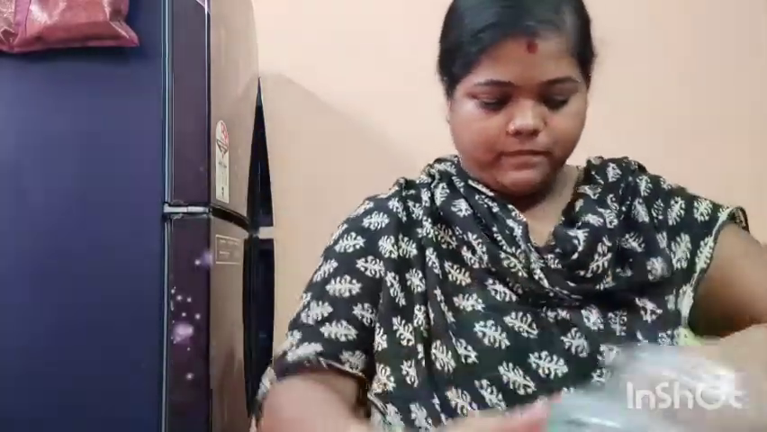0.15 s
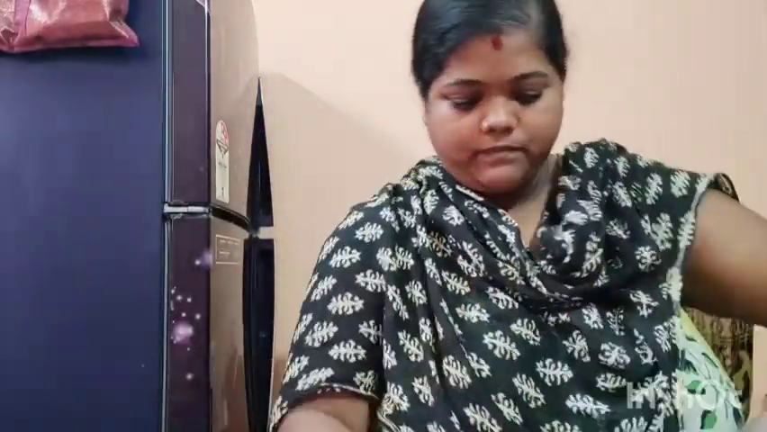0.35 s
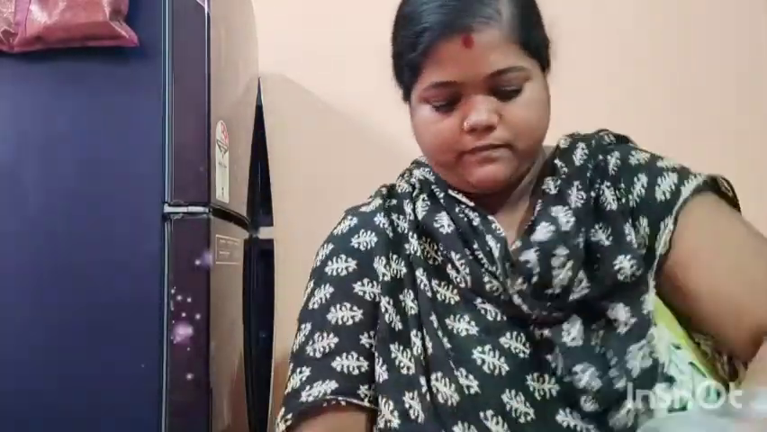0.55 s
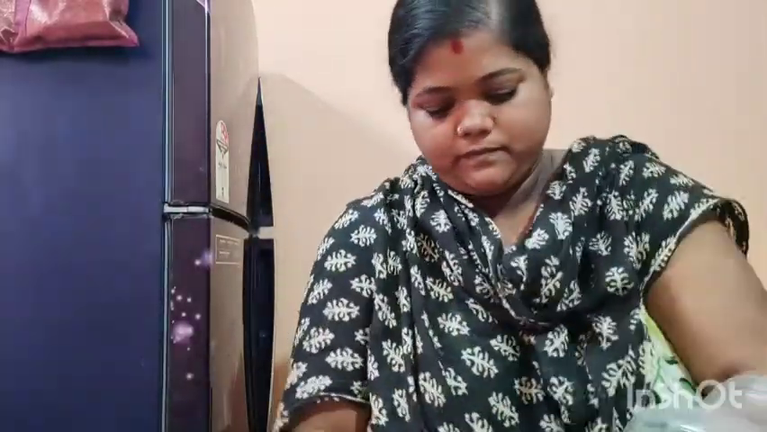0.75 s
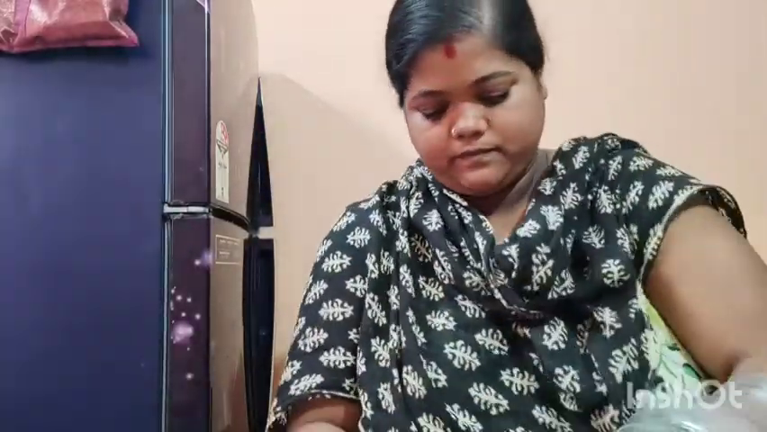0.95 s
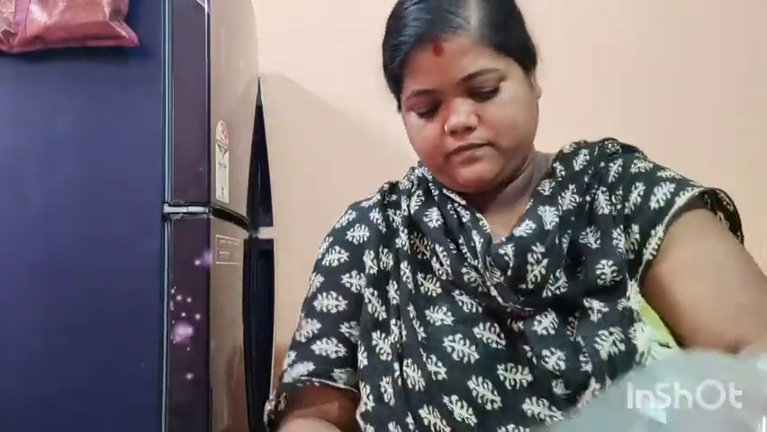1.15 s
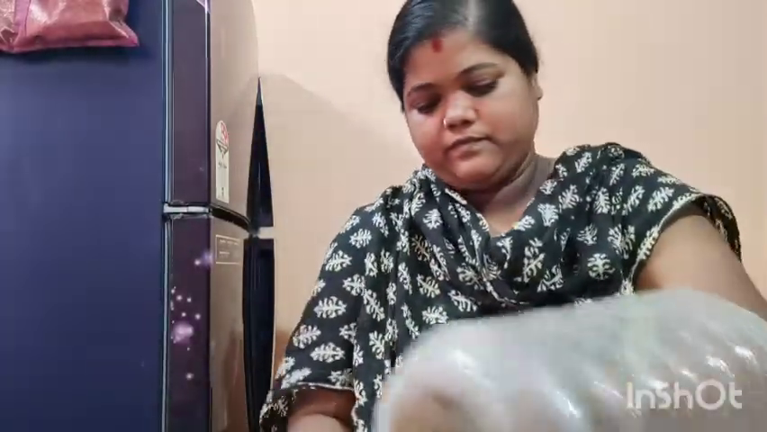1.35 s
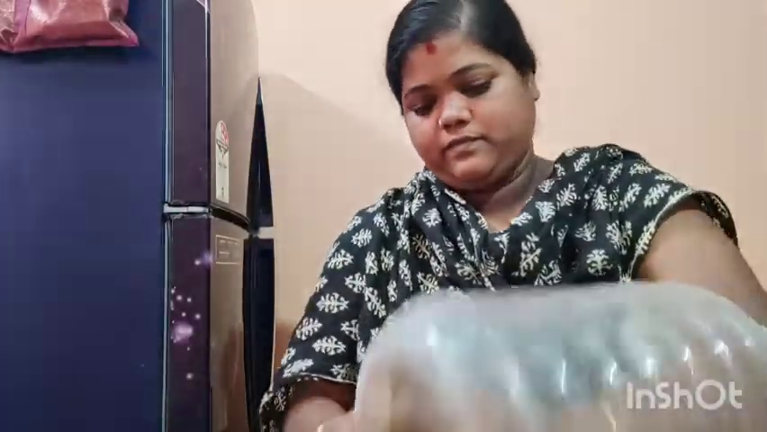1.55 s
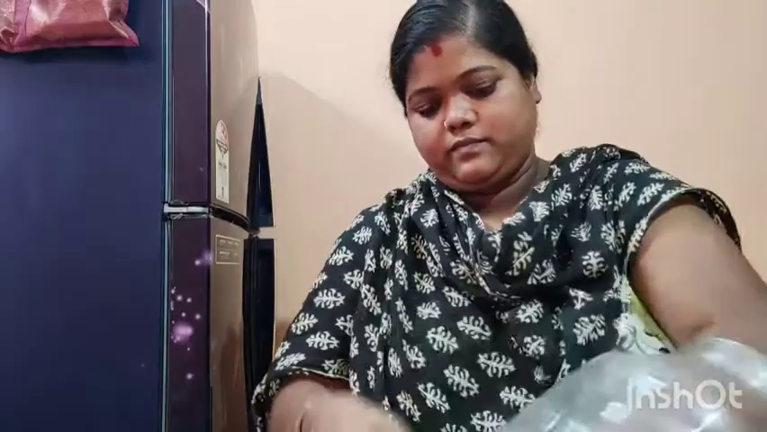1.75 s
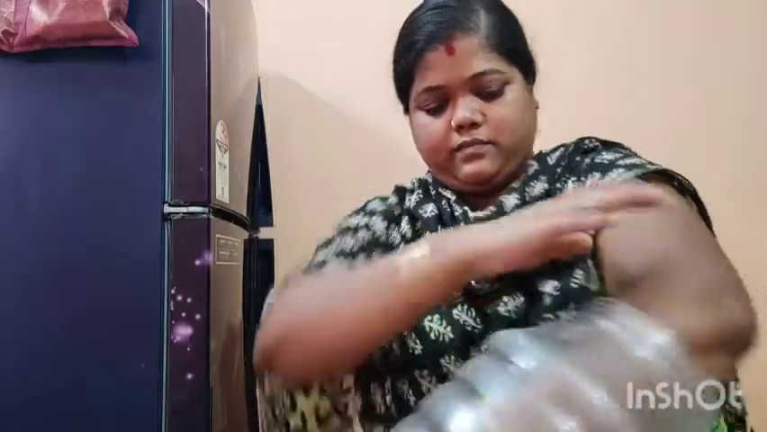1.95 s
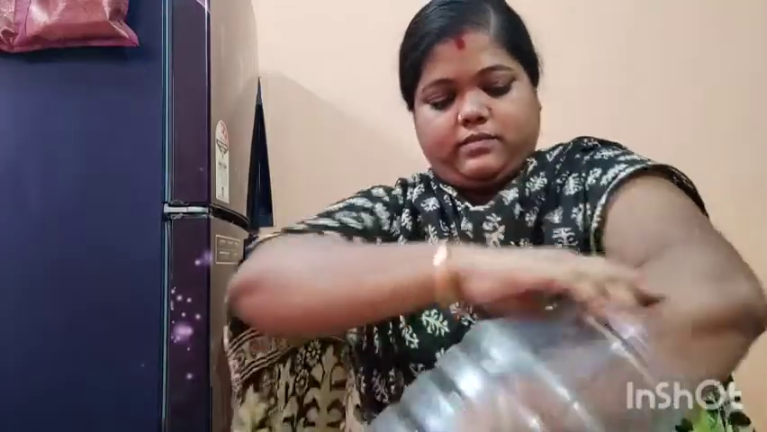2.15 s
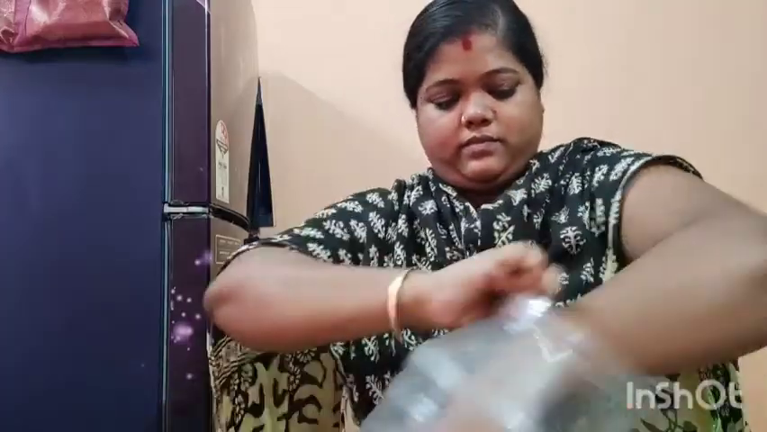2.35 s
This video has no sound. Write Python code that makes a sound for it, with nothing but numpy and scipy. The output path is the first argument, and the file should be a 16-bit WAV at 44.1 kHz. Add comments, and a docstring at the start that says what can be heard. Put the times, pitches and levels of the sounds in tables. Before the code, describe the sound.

A large hollow plastic jar is wiped with a cloth, close in stereo in a small, hard-walled kitchen. A firm scrub with boomy wall flexes peaks around 0.2-0.4 s; a plastic tub clatters brightly at 0.53. Softer rubbing follows, with a faint tap at 1.12 and a hiss near 1.3. Hollow bumps come at 1.5-1.75, then near quiet, a thump and click at 2.2, and another click at 2.43 amid renewed wiping.

```python
"""Wiping a plastic jar

A cloth wipes a large clear plastic jar in a small, hard-walled kitchen, with two microphones close by.
Tiny slips of the cloth hiss, scrub and make the hollow jar sing; sliding low tones are wall flexes, bumps
and thumps. A tub clatters, the jar is bumped as it is turned over, and tub and rim give bright clicks:
struck modes over dense washes. The kitchen answers with a decaying noise tail, above a still room's hush."""
import sys
import numpy as np
from scipy import signal
from scipy.fft import rfft, irfft, next_fast_len
from scipy.io import wavfile
from scipy.ndimage import map_coordinates

SR = 44100
rng = np.random.default_rng(int(sys.argv[2]) if len(sys.argv) > 2 else 0)


def bounce(signal):
    """Save signal as a 16-bit WAV file at the path given by the first command-line argument."""
    frames = np.transpose(np.atleast_2d(signal))
    limited = np.clip(frames, -1, 1)
    pcm = np.round(limited * 32767).astype(np.int16)
    wavfile.write(sys.argv[1], SR, pcm)


N = 110250  # samples: 2.5 s

# All levels are relative. Spectra list pitch_hz, density_db_per_hz.
# Speed of the cloth, as hiss: time_s, level_db
WIPE_SPEED = [(0, -61), (.09, -54), (.14, -45), (.212, -45), (.224, -31), (.3, -43), (.42, -41.5),
              (.5, -52), (.66, -49), (.72, -40.5), (.78, -49.5), (1.02, -47), (1.11, -50), (1.21, -47),
              (1.285, -34.5), (1.4, -55.5), (1.445, -42), (1.5, -56.5), (1.61, -44), (1.7, -42),
              (1.76, -49), (1.795, -42.5), (1.86, -55.5), (2.13, -56), (2.21, -53), (2.26, -48),
              (2.5, -45.5)]
# Firm strokes that make the hollow jar sing: start_s, length_s, level_db
FIRM_STROKES = [(0.183, 0.11, -37.5), (2.239, 0.25, -42), (2.44, 0.062, -39.5)]
# Pressure of the hand on the wall, as scrubbing: time_s, level_db
HAND_PRESSURE = [(.1, -54), (.14, -41.5), (.2, -50.5), (.25, -32.5), (.33, -36.5), (.42, -47), (.47, -40),
                 (.75, -38), (.86, -49), (1.05, -44), (1.2, -52), (1.3, -47), (1.4, -57), (1.45, -41.5),
                 (1.51, -50.5), (1.6, -47), (1.66, -39.5), (1.77, -39), (1.9, -57.5), (2.17, -55),
                 (2.27, -46), (2.5, -42.5)]
# Low tones of the jar: wall flexes, dull bumps and thumps:
# start_s, rise_s, fade_t60_s, first_hz, last_hz, level_db
LOW_TONES = [(0.115, 0.053, .42, 261, 287.4, -35.5), (0.228, 0.02, 0.091, 303, 240, -21.5),
             (.252, 0.027, 0.3, 139, 128.7, -16.5), (.305, 0.021, 0.12, 254, 279, -22.5),
             (0.329, 0.02, 0.076, 128, 148, -32), (0.366, .018, 0.14, 274, 215, -31.5),
             (0.389, 0.035, 0.13, 159.5, 117.5, -31.5), (.457, 0.0062, 0.087, 159, 90, -25),
             (0.456, 0.017, 0.11, 263, 325, -29.5), (.497, 0.01, 0.73, 132.7, 151, -28.5),
             (0.678, 0.023, .17, 224, 172, -36), (.724, 0.031, 0.31, 136, 121, -34),
             (0.979, 0.082, 0.094, 119, 140.5, -42), (1.288, 0.028, 0.36, 182, 119.6, -36),
             (1.442, 0.029, 0.9, 84.4, 135, -39.5), (1.525, 0.0033, 0.08, 313, 335, -21),
             (1.538, 0.017, 0.086, 347, 353, -23.5), (1.665, 0.042, 0.38, 148.7, 117.4, -34.5),
             (2.195, 0.0031, 0.054, 383, 267, -25), (2.206, 0.0081, 0.15, 139.4, 121, -25),
             (2.203, 0.018, 0.73, 176.5, 183.7, -31)]
# Soft bumps on the jar: start_s, level_db, contact_hardness_hz
JAR_BUMPS = [(1.5245, -25, 1160), (1.637, -27.5, 1490), (1.6935, -22.5, 3800), (1.698, -12.5, 1180),
             (1.704, -31, 1480), (1.7115, -30, 2220), (1.727, -28, 1700), (1.735, -38, 2400),
             (1.765, -34, 990)]
# The tub clattering, then one more tap: start_s, level_db, contact_hardness_hz
TUB_BLOWS = [(.5305, -18.5, 8700), (.5355, -25, 7250), (.542, -19.5, 4400), (.549, -22.5, 2080),
             (.556, -27, 2200), (.565, -28, 3200), (1.123, -40.5, 2380)]
# Bright clicks: the tub's first tick, its later tap, two clicks of the rim:
# start_s, level_db, contact_hardness_hz
BRIGHT_CLICKS = [(.528, -21.5, 14200), (1.1236, -44.5, 3000), (2.2295, -27, 12200), (2.4315, -27.5, 9350)]

# Clear ringing modes of the jar, the tub and the bright clicks: pitch_hz, level_db, t60_s
JAR_MODES = [(285.6, -8.5, 0.067), (359, -12, 0.15), (603, -10.5, 0.11), (748.7, -9, 0.069),
             (1082, -13.5, 0.062), (1305, -9.5, 0.04)]
TUB_MODES = [(194, -20.5, .3), (391.4, -8, 0.38), (463, -9, 0.2), (547, -8.5, 0.15), (724, -6, 0.11),
             (785, -3, 0.077), (924, -7.5, .13), (1004, -5, 0.074), (1104, -12.5, 0.18), (1335, -11, 0.25),
             (1492, -12, 0.15), (1660, -8.5, 0.089), (1852, -21.5, 0.3), (2284, -14, 0.14),
             (2638, -1.5, 0.077), (2890, -16, 0.12), (2963, -7, 0.077)]
CLICK_MODES = [(2330, 5, 0.014), (2910, 6, 0.025), (3390, -8.5, 0.018)]

# Fine cloth hiss on plastic: pitch_hz, density_db_per_hz
HISS_SPECTRUM = [(500, -25), (1500, -15.5), (3000, -9.5), (5000, -10), (6900, -6), (7900, 2), (8500, -4),
                 (9600, -6), (10600, -18), (12500, -24), (15500, -35)]
# Slips coloured by the hollow of the jar: pitch_hz, density_db_per_hz
HOLLOW_SPECTRUM = [(300, -38), (600, 3), (920, 4.5), (1150, 5.5), (1500, -2.5), (2400, -3.5), (3200, -9),
                   (5000, -30)]
# The scrubbed wall: pitch_hz, density_db_per_hz
SCRUB_SPECTRUM = [(30, -18), (80, 3.5), (190, 9.5), (290, 2), (420, 5), (600, -4), (1050, -3.5), (1600, -9),
                  (2700, -9.5), (4000, -55), (9000, -68)]
# Dense higher modes of the jar, the tub and the bright clicks: pitch_hz, density_db_per_hz
JAR_WASH_SPECTRUM = [(40, -26), (100, -3), (300, 11.5), (500, -1), (750, 6), (1300, -3.5), (2600, -4.5),
                     (4500, -12), (8000, -4), (12000, -34)]
TUB_WASH_SPECTRUM = [(40, -38), (110, -5), (280, 1), (420, 7), (900, 3), (1800, -1), (2800, -2.5),
                     (3600, -13.5), (4600, -5.5), (6000, -11), (8500, -4.5), (10500, -16), (13000, -47)]
CLICK_WASH_SPECTRUM = [(300, -8.5), (1200, -2), (2600, 2.5), (4500, -10), (8000, -5), (9800, -7),
                       (12000, -38), (15500, -26)]
# The crack that opens a bright click: pitch_hz, density_db_per_hz
SNAP_SPECTRUM = [(2000, -14), (5000, -9), (8000, 11), (10000, -3), (12000, -26), (15500, -19)]
# The still room: pitch_hz, density_db_per_hz
STILL_SPECTRUM = [(15, -24), (25, 1.5), (86, -17.5), (1340, -20.5), (9050, -35.5), (15500, -56)]

# Decay of the kitchen: pitch_hz, t60_s
ROOM_DECAY = [(100, 0.29), (500, 0.65), (6000, 0.83), (12000, 0.22)]
# Likeness of the two microphones, 1 for identical: pitch_hz, likeness
MIC_LIKENESS = [(60, 0.58), (200, 0.98), (550, 0.5), (1650, 0.099), (5000, 0)]
# Balance of the two microphones: pitch_hz, left_minus_right_db
MIC_BALANCE = [(100, 5.5), (380, 4), (750, 2.5), (2400, -1), (4400, -2), (8000, -6), (14000, 6.5)]

SCRUB_RING_DB, SCRUB_RING_WIDTH_HZ = -13, 20.8
GLIDE_S, OVERTONE_DB = 0.039, -18
TONE_WANDER, TONE_ROUGH = 0.025, 0.28  # random depth of pitch and of loudness, as fractions
SNAP_DB, SNAP_T60_S = 5, 0.008  # level is over that of its click
STILL_DB = -52
TOP_HZ = 15900


def amp(db):
    """Decibels to gain."""
    return 10 ** (np.asarray(db) / 20)


def unit(x):
    """Scale to rms 1."""
    return x / np.sqrt(np.mean(x ** 2) + 1e-20)


def along(points, hz):
    """Read (Hz, value) points on a log frequency axis."""
    f, v = np.transpose(points)
    return np.interp(np.log(hz + 1), np.log(f + 1), v)


def curve(rows):
    """One value per sample from (s, value) rows."""
    return np.interp(np.arange(N) / SR, *np.transpose(rows))


def wobble(rate):
    """A smooth random curve, rate knots a second."""
    knots = rng.standard_normal(int(N * rate / SR) + 4)
    return map_coordinates(knots, [np.arange(N) * rate / SR])


def filtered(x, response):
    """Multiply the spectrum of x by a response of frequency."""
    n = x.shape[-1]
    m = next_fast_len(n + 8192)
    return irfft(rfft(x, m) * response(np.fft.rfftfreq(m, 1 / SR)), m)[..., :n]


def half_angle(hz):
    """Half the phase angle whose cosine is the likeness of the microphones."""
    return np.arccos(np.clip(along(MIC_LIKENESS, hz), -1, 1)) / 2


def spread(pair, spectrum):
    """Colour two unrelated signals into a stereo pair of rms 1, most alike near 200 Hz."""
    def response(hz):
        mid_side = np.array([np.cos(half_angle(hz)), np.sin(half_angle(hz))])
        return amp(along(spectrum, hz)) * mid_side

    mid, side = filtered(pair, response)
    return unit(np.array([mid + side, mid - side]))


def stereo_noise(n, spectrum):
    """Coloured noise, n samples long, across the two microphones."""
    return spread(rng.standard_normal((2, n)), spectrum)


def add(track, s, sound):
    """Mix a sound into the track at s seconds."""
    i = round(s * SR)
    track[:, i:i + sound.shape[-1]] += sound[..., :N - i]


def slips(per_s):
    """Tiny stick-slip catches: shared instants, but unrelated uneven sizes in the two signals."""
    caught = rng.random(N) < per_s / SR
    return unit(caught * rng.standard_normal((2, N)))


def cloth():
    """Fibres catch on the plastic: a fine hiss that follows the speed of the stroke."""
    level_db = curve(WIPE_SPEED) + 1.5 + 1.5 * wobble(58.66)
    return spread(slips(per_s=9000), HISS_SPECTRUM) * amp(level_db)


def rubs():
    """A firm stroke swells and fades, its slips coloured by the hollow of the jar."""
    level, t = np.zeros(N), np.arange(N) / SR
    for s, length_s, db in FIRM_STROKES:
        level += amp(db) * np.sin(np.pi * np.clip((t - s) / length_s, 0, 1))
    return spread(slips(per_s=2200), HOLLOW_SPECTRUM) * level * amp(wobble(49.36))


def jar_resonance(f):
    """Sum of one resonant peak for each clear mode of the jar."""
    damping = 1j * f * SCRUB_RING_WIDTH_HZ
    return sum(damping / (hz * hz - f * f + damping) for hz, _, _ in JAR_MODES)


def scrub():
    """Coarser slips under the hand's pressure shake the wall and ring the jar."""
    body = spread(slips(per_s=3900), SCRUB_SPECTRUM)
    ring = unit(filtered(body, jar_resonance))
    level_db = curve(HAND_PRESSURE) + 2.0 + 1.1 * wobble(33.4)
    return (body + amp(SCRUB_RING_DB) * ring) * amp(level_db)


def low_tones():
    """A low tone swells, slides unsteadily in pitch and dies."""
    out, t = np.zeros((2, N)), np.arange(N) / SR
    for s, rise_s, t60, first_hz, last_hz, db in LOW_TONES:
        hz = last_hz + (first_hz - last_hz) * np.exp(-t / GLIDE_S)
        phase = 2 * np.pi * np.cumsum(hz * (1 + TONE_WANDER * wobble(65.6))) / SR
        tone = np.sin(phase) + amp(OVERTONE_DB) * np.sin(2 * phase)
        swell = np.minimum(t / rise_s, 1) * amp(db - 60 * np.maximum(t - rise_s, 0) / t60)
        add(out, s, swell * (1 + TONE_ROUGH * wobble(128.6)) * tone)
    return out


def struck(blows, modes, wash_spectrum, wash_db, wash_t60, attack_s):
    """Each blow rings the clear modes and starts a wash of dense ones; soft contact dulls both."""
    out, t = np.zeros((2, N)), np.arange(SR // 2) / SR
    left_right = np.array([[1], [-1]])
    skews = [half_angle(hz) * rng.choice([-1, 1]) * left_right for hz, _, _ in modes]
    for s, db, hardness_hz in blows:
        ring = np.zeros((2, len(t)))
        for (hz, level, t60), skew in zip(modes, skews):
            fade = amp(level + rng.normal(0, 0.92) - 60 * t / t60)
            # phase counts from the start of the scene, so successive blows ring in step
            ring += fade * np.sin(2 * np.pi * hz * (s + t) + skew)
        dense = stereo_noise(len(t), wash_spectrum) * amp(wash_db - 60 * t / wash_t60)
        contact = signal.butter(2, min(hardness_hz, SR / 2 - 1000), fs=SR)
        onset = 1 - np.exp(-t / attack_s)
        add(out, s, amp(db) * signal.lfilter(*contact, (ring + dense) * onset))
    return out


def jar_bumps():
    """Soft bumps excite the jar's short modes and its dense wash."""
    return struck(JAR_BUMPS, JAR_MODES, JAR_WASH_SPECTRUM, wash_db=-2.5, wash_t60=0.14, attack_s=0.0006)


def tub_clatter():
    """Quick blows, then one more tap, ring the tub's modes and its dense wash."""
    return struck(TUB_BLOWS, TUB_MODES, TUB_WASH_SPECTRUM, wash_db=2.5, wash_t60=0.21, attack_s=0.00053)


def bright_clicks():
    """Ticks of the tub and clicks of the rim: very short high modes over a dense wash."""
    return struck(BRIGHT_CLICKS, CLICK_MODES, CLICK_WASH_SPECTRUM,
                  wash_db=1.5, wash_t60=0.1, attack_s=0.00081)


def snaps():
    """Every bright click opens with an instant crack."""
    out, t = np.zeros((2, N)), np.arange(SR // 20) / SR
    for s, db, _ in BRIGHT_CLICKS:
        fade = amp(db + SNAP_DB - 60 * t / SNAP_T60_S)
        add(out, s, stereo_noise(len(t), SNAP_SPECTRUM) * fade)
    return out


def kitchen(x, wet_db):
    """The sound plus the room's answer, each frequency dying at its own speed."""
    flat = [(20, 0), (20000, 0)]
    hz, t, z = signal.stft(stereo_noise(SR * 3 // 4, flat), SR, nperseg=256)
    fade = amp(-60 * t / along(ROOM_DECAY, hz)[:, None])
    tail = signal.istft(z * fade, SR, nperseg=256)[1]
    tail = np.pad(tail / np.linalg.norm(tail[0]), ((0, 0), (SR // 200, 0)))  # 5 ms before the answer
    mono = x.sum(0)[None] / np.sqrt(2)
    return x + amp(wet_db) * signal.fftconvolve(mono, tail, axes=1)[:, :N]


def still_room():
    """The room's own hush: steady coloured noise."""
    return amp(STILL_DB) * stereo_noise(N, STILL_SPECTRUM)


def scene():
    """Wiping, handling noises and the room's own hush, heard by two close microphones."""
    wiping = kitchen(cloth() + rubs(), wet_db=-10.5) + scrub()
    tones = kitchen(low_tones(), wet_db=-18)
    jar = kitchen(jar_bumps(), wet_db=-14.5)
    tub = kitchen(tub_clatter(), wet_db=-13)
    clicks = kitchen(bright_clicks() + snaps(), wet_db=-8)
    mix = wiping + tones + jar + tub + clicks + still_room()
    halves = np.array([[.5], [-.5]])  # half the balance to each microphone
    return filtered(mix, lambda hz: amp(along(MIC_BALANCE, hz) * halves))


def record(dry):
    """Nothing is kept above the band limit."""
    return filtered(dry, lambda hz: hz < TOP_HZ)


dry = scene()
out = record(dry)
bounce(out)
```